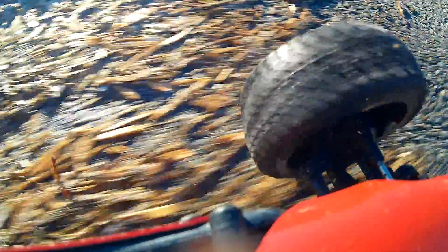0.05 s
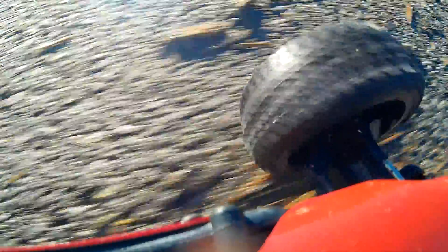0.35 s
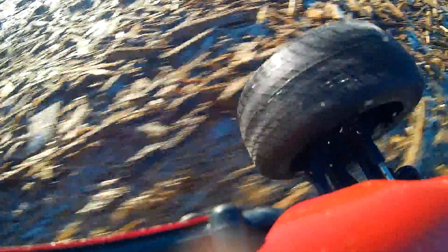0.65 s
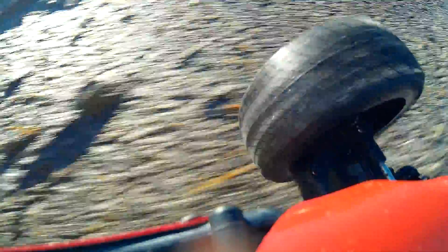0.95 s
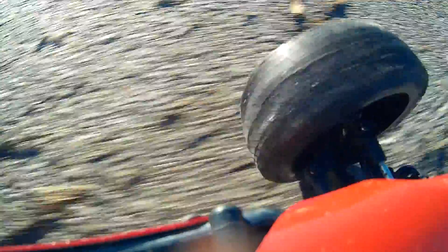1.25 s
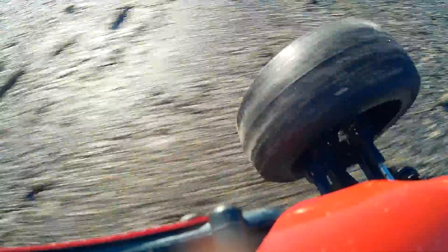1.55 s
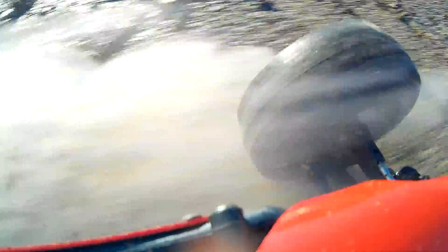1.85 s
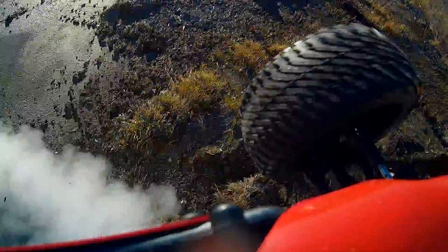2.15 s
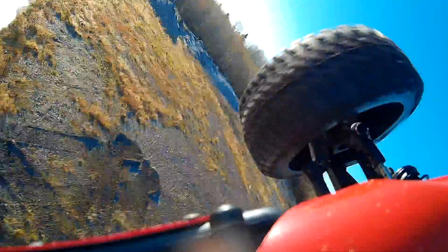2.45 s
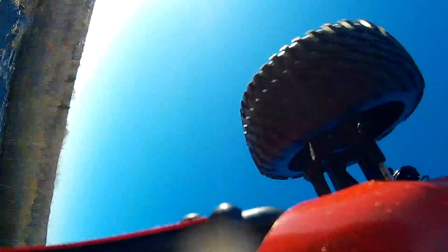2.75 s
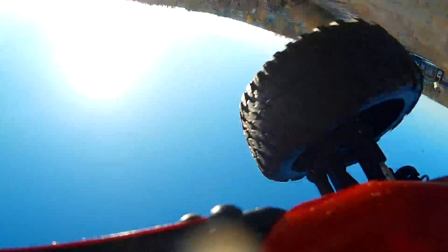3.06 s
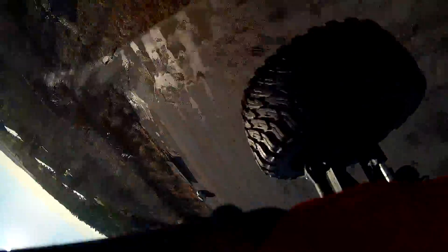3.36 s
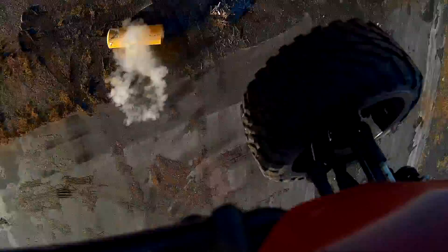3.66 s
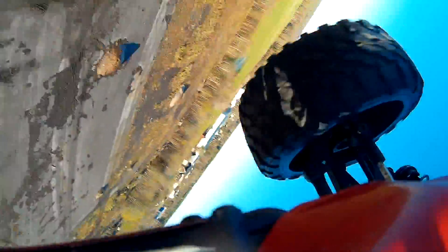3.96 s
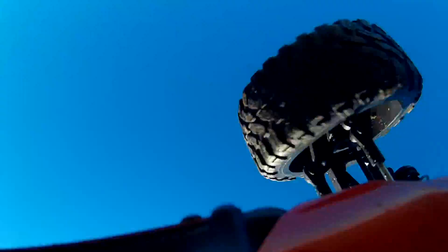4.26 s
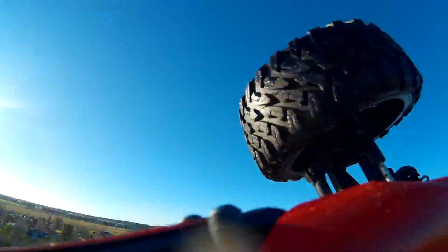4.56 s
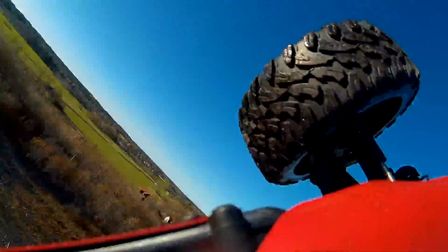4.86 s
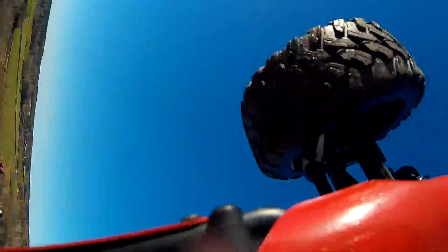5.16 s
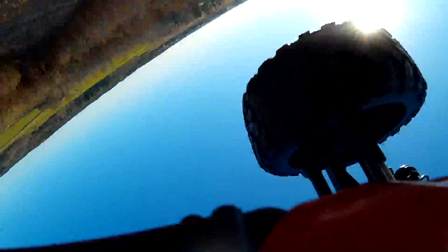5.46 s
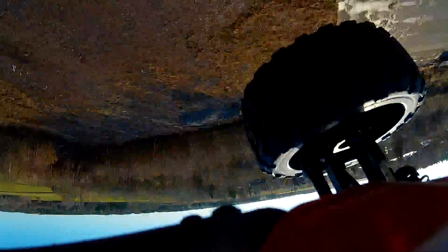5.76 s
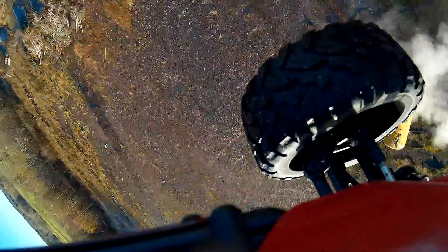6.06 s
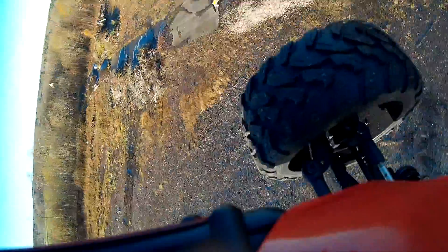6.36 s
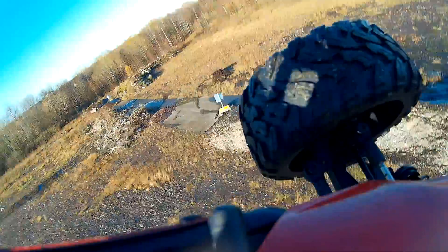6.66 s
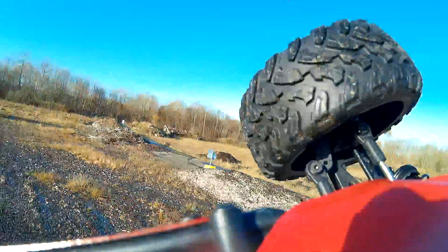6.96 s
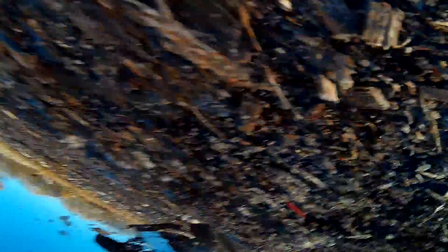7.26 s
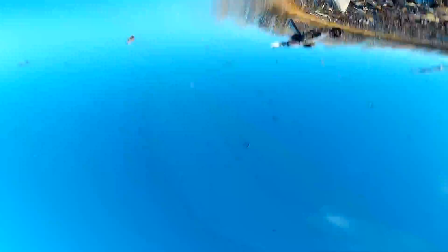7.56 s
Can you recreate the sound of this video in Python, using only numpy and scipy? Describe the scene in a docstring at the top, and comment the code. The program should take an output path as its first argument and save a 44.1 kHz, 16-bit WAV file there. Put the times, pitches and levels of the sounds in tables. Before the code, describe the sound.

A small electric model car is heard outdoors from a microphone on its body. At first its gears whine, rising and dipping, while the tyres drum on rough asphalt. A rocket motor sputters at about 1.4 and 1.6 seconds, then lights at 1.8 with a loud, bright hiss and a falling whoosh as the tyre noise stops. A distorted blast of air hits near 2.6 seconds and the hiss cuts off. In gusting wind, the free wheels blip at 3 seconds, spin up to a steady high hum from about 3.7, and wind down between 5.1 and 5.5. Air then whistles thinly, and heavy buffeting overloads the microphone just after 6 seconds. A short rising rev comes near 6.7. At 7.1 the car crashes with sharp cracks and thumps. Wood chips patter, and more clattering plastic knocks follow around 7.55 and 7.75 seconds.

```python
"""Gears whine and tyres drum on rough asphalt, heard from a microphone on a small electric model car.
A rocket motor sputters, lights and throws the car into the air. It tumbles through the wind, wheels
spinning up and braking, then crashes and cartwheels over wood chips. Each blow cracks, rings the
plastic shell and thumps the suspension. Rushing air and blows overload the microphone."""
import sys
import numpy as np
from scipy import signal
from scipy.fft import rfft, irfft
from scipy.io import wavfile
from scipy.ndimage import uniform_filter1d

SR = 44100
rng = np.random.default_rng(int(sys.argv[2]) if len(sys.argv) > 2 else 0)


def int16_out(signal):
    """Quantize to a 16-bit WAV file."""
    q = np.round(np.clip(np.atleast_2d(signal).T, -1, 1) * 32767)
    wavfile.write(sys.argv[1], SR, q.astype(np.int16))


N = 343980

# Levels are relative. Falls are per 20 dB; a negative fall cuts off at once.
TEETH = 39
TAKEOFF_S, TAKEOFF_FADE_S = 1.8, 0.1
GRIP_S, SPIN_UP_POWER = 0.042, 1.25
STRAIN_FULL_HZ_PER_S, STRAIN_WHINE_DB, STRAIN_OVERTONES_DB = 5830, 6.5, 2.5
GEARBOX_HZ, GEARBOX_WIDTH_HZ, GEARBOX_DB = 855, 65, 10
CRAWL_HZ, CRAWL_POWER, DULL_POWER, DULL_HZ = 960, 0.93, 1.76, 2040  # slow teeth: softer, duller
# skipping wheels race, then grip: t/s at the slowest, mesh before/Hz, mesh after/Hz
TYRE_GRIPS = [(0.036, 1298, 965), (0.156, 1260, 926), (.375, 1197, 995), (.51, 1417, 987),
              (.775, 1550, 1050), (.95, 1460, 1057), (1.125, 1422, 1093), (1.274, 1342, 1160),
              (1.39, 1370, 1200), (1.669, 1323, 1210), (1.78, 1340, 1255)]
# mesh rate in flight (blip, top speed, brake): t/s, f/Hz
FLIGHT_MESH = [(2.99, 943), (3.13, 1223), (3.391, 1151), (3.68, 1673), (3.82, 1730), (4.9, 1750),
               (5.07, 1716), (5.2, 1482), (5.3, 1213), (5.41, 766), (5.5, 150)]
# mesh rate of the last rev: t/s, f/Hz
LANDING_MESH = [(6.68, 180), (6.73, 505), (6.885, 802), (6.93, 1012), (6.98, 1400), (7.029, 1410),
                (7.16, 1273)]
# throttle: start/s, rise/s, hold/s, fall/s, rattle/dB, whine/dB
THROTTLE_BURSTS = [(-.1, .05, 1.37, -4.8, -28.5, -28), (1.099, 0.41, .3, 0.2, -27.5, -22.5),
                   (2.728, 0.074, .78, .2, -31.5, -47), (2.888, 0.19, 0.15, 0.8, -24, -33.5),
                   (3.232, 0.49, 1.76, 0.14, -24, -35.5), (6.639, 0.089, 0.375, 0.1, -23.5, -32.5)]
# mesh overtones: multiple, ground level/dB, air level/dB, roughness
MESH_OVERTONES = [(2, -18, -24, .6), (3, -23, -18, .6), (4, -22, -28, .8), (5, -15, -18, .7)]
# top-speed hum against mesh rate: f/Hz, level/dB
HUM_BY_MESH = [(1300, -39), (1550, -16.5), (1690, -6.5), (1750, -2)]
# hum lines: multiple of wheel rate, level/dB
HUM_LINES = [(2, -48.5), (7, -68), (8, -48.5), (9, -52), (11, -49.5), (18, -40), (19, -62), (30, -40),
             (38, -46), (40, -27), (41, -41), (42, -66), (45, -32), (75, -41), (82, -46), (84, -33)]
# broad chassis response: f/Hz, level/dB
CHASSIS_SLOPE = [(60, -16), (220, -51), (500, -4.5), (800, -2), (1300, 7.5), (2400, 0), (4500, 1),
                 (7800, -2.5), (9800, 7), (11000, 2), (12300, 9), (13800, -1)]
# chassis resonances: f/Hz, width/Hz, level/dB
CHASSIS_MODES = [(864, 173, 7.1), (1976, 153, 8.4), (2870, 550, 3.8), (3690, 370, 5.7), (5160, 160, 6.8),
                 (7020, 610, 3.9), (8620, 210, 5.1)]

# two sputters, burn, last gas: start/s, rise/s, hold/s, fall/s, level/dB
ROCKET_BURNS = [(1.402, 0.013, 0.0069, .08, -12), (1.63, .085, 0.011, -0.08, -10),
                (1.782, 0.066, 0.68, 0.265, -8), (2.55, 0.059, 0.11, -3.5, -19)]
# jet hiss: f/Hz, level/dB
JET_SPECTRUM = [(200, -4.5), (500, -3), (1000, -4.5), (1500, -1), (3000, -1), (6000, -1.5), (8000, 0.5),
                (9500, 4), (11500, 4), (13000, 3), (14000, -1), (14600, -12.5)]
# take-off whoosh: t/s, level/dB, f/Hz
JET_WHOOSH = [(1.95, -39, 7000), (2.0, -12, 4580), (2.025, -13, 1940), (2.06, -10, 1040), (2.11, -10, 684),
              (2.15, -23, 480)]

# flow past the car: t/s, level/dB
AIRFLOW_LEVEL = [(0, -29), (1.6, -28), (1.95, -40), (2.4, -23.5), (2.85, -9.5), (3.0, -26.5), (3.55, -30),
                 (3.75, -38), (4.3, -37), (4.45, -51), (4.76, -52), (5.12, -29), (5.85, -35), (6.15, -11),
                 (7.14, -26), (7.25, -35.5), (7.47, -42.5), (7.8, -31)]
# swells of rushing noise from jet wash, wind gusts and a scrape in the crash:
# start/s, rise/s, hold/s, fall/s, level/dB, brightness/Hz
RUSH_SWELLS = [(1.96, .13, .08, .25, -13.5, 1250), (2.22, .11, .35, .04, -11, 800),
               (2.535, .07, .032, .013, 10, 900), (2.695, .02, .014, .012, 3, 280),
               (2.765, .04, .085, .06, -10.5, 95), (3.265, .035, .25, .12, -16, 205),
               (3.73, .09, .04, .24, -22.5, 400), (4.06, .04, .02, .12, -28, 140),
               (5.03, .2, .15, .1, -28, 330), (5.4, .04, .03, .06, -22, 330), (5.45, .2, .35, .1, -25, 720),
               (5.99, .04, .05, .1, -12, 300), (6.05, .09, .075, .025, 0, 105),
               (6.255, .03, .19, .03, -3, 180), (6.5, .03, .19, .08, -26, 270),
               (6.73, .11, .28, .08, -22.5, 520), (7.32, .035, .005, .05, -29, 200)]
# air singing over edges: t/s, level/dB, f/Hz
EDGE_TONE = [(5.42, -26.5, 2035), (5.5, -27.5, 1980), (5.6, -34, 2420), (5.68, -23.5, 3020),
             (5.78, -24, 2560), (5.88, -24.5, 2160), (6.01, -23, 1900), (6.1, -38, 1790)]
# turbulence feeding the edge tone: f/Hz, level/dB
EDGE_SPECTRUM = [(200, 7.5), (2000, 0), (4000, -6), (7000, -23), (14000, -3)]
# thin hiss of the descent: t/s, level/dB
HISS_LEVEL = [(5.6, -48), (5.8, -34), (6.02, -28), (6.07, -31.5)]
# same hiss: f/Hz, level/dB
HISS_SPECTRUM = [(1500, -1), (4200, 2), (7000, -8), (13000, -12)]
# single eddies on the microphone: t/s, level/dB, half-width/s
EDDY_SLAPS = [(5.439, -16, 0.0066), (5.484, -17.5, 0.0027), (6.149, -3.5, 0.0075), (6.167, -4, 0.0036),
              (6.19, 0.5, 0.0019), (6.28, -5, 0.0011), (6.322, -8, 0.0072), (6.357, -8, 0.0084),
              (6.507, -10.5, 0.00087), (6.538, -23.5, 0.0066), (6.678, -18.5, 0.0017), (6.708, -32, 0.0054)]
# eddy slap: f/Hz, level/dB
SLAP_SPECTRUM = [(30, -12), (90, 7), (300, -1.5), (900, -9.5), (2000, -12), (5000, -24.5), (14000, -43)]
# buffeting: f/Hz, level/dB
BUFFET_SPECTRUM = [(12, -1), (30, -12.5), (60, -5.5), (110, -13), (300, -44), (2000, -91)]

# impacts: t/s, crack/dB, crack decay/s, shell ring/dB, thump/dB
CRASH_BLOWS = [(7.13, 5, 0.0068, -20, -24), (7.134, 5, 0.0034, -17.5, -7), (7.141, 1, 0.0025, 2, -4),
               (7.158, 3.5, 0.0031, -3, 4.5), (7.163, 8, 0.0018, -19, -21), (7.174, -12, 0.003, -19, -29),
               (7.186, -34, 0.0067, -34, -34), (7.2198, -22, 0.0022, -25, -36),
               (7.2534, -19, 0.00053, -42, -42), (7.312, -18.5, 0.0014, -40, -41),
               (7.3348, -32, 0.0015, -22, -24), (7.411, -38, 0.0059, -30, -50),
               (7.461, -30.5, 0.0049, -35, -46), (7.512, -39, 0.0024, -38, -44), (7.55, -6, 0.0034, 6, -33),
               (7.5629, 8, 0.0009, -7, -2), (7.5675, 6.5, 0.0014, -18, -31), (7.572, -10, 0.0022, -2, -21),
               (7.585, -20, 0.0048, -11, -10), (7.5941, 1, 0.00093, -4, -31),
               (7.621, -19, 0.00089, -22, -49), (7.665, -35, 0.013, -44, -40),
               (7.6725, -30, 0.001, -15, -31), (7.6945, -41, .003, -22, -29),
               (7.7165, -35, 0.0035, -24, -27), (7.7464, 0.5, 0.0012, -8, -22),
               (7.752, -27, 0.0043, -33, -31), (7.7571, -14, 0.0023, -25, -21),
               (7.7624, 4, 0.0043, -23, -24), (7.771, -26, .004, -22, -26), (7.777, -5, 0.0042, -4, -4),
               (7.795, -46, 0.0036, -22, -31)]
# plastic shell: f/Hz, level/dB, t60/s
SHELL_MODES = [(1930, -24, 0.035), (3000, -10.5, 0.023), (4130, -6.5, 0.032), (4360, -6.5, 0.014),
               (4630, -4.5, 0.012), (5100, -22, .012), (9700, -32, .008)]
# loose wood chips: t/s, level/dB
CHIP_LEVEL = [(7.17, -37), (7.25, -48), (7.42, -51), (7.52, -58), (7.65, -53), (7.7, -47.5), (7.8, -65)]
# cracks and chips: f/Hz, level/dB
CRACK_SPECTRUM = [(100, 7), (700, 2), (1300, -0.5), (1900, 7), (2600, -3.5), (4300, -1.5), (6000, -3),
                  (10000, -1), (14000, -7)]

# asphalt bumps: t/s, level/dB, half-width/s
ROAD_BUMPS = [(.02, -31, 0.081), (.445, -22, 0.015), (1.39, -29, 0.018), (1.666, -22, 0.0077)]
# tyres on grit: f/Hz, level/dB
TYRE_SPECTRUM = [(25, -8), (70, 1), (200, 3), (400, 1.5), (700, -4), (1500, -9.5), (2500, -14),
                 (4000, -17.5), (7000, -26.5), (14000, -28)]


def drive(waver=0.0043, jitter=0.0074, throb_db=0.34, rattle_db=4.0, overtones_db=1.5, soften_db=-8):
    """Gear teeth whine and rattle; the wheel runs out of true, so both swell once a turn."""
    mesh_hz, on_ground = mesh_rate(), ground_contact()
    pace = np.minimum(mesh_hz / CRAWL_HZ, 1)
    force, whine_gain = throttle() * pace ** CRAWL_POWER
    # teeth press harder while the free wheels speed up or brake
    strain = (1 - on_ground) * np.minimum(np.abs(np.gradient(mesh_hz)) * SR / STRAIN_FULL_HZ_PER_S, 1)
    speed_spread = jitter * (on_ground + 0.064) + waver * strain
    mesh_rad = 2 * np.pi * np.cumsum(mesh_hz * (1 + speed_spread * drift(60.6))) / SR
    wheel_rad = mesh_rad / TEETH
    throb = from_db(throb_db * (np.sin(wheel_rad) + 2.3 * drift(270)))
    knocking = throb * (1 + 0.18 * np.cos(mesh_rad))
    rattle = from_db(rattle_db) * knocking * noise(chassis_db(bins_hz()))
    dull = signal.sosfiltfilt(signal.butter(2, DULL_HZ, fs=SR, output="sos"), rattle)
    rattle = dull + pace ** DULL_POWER * (rattle - dull)
    tone = whine_gain * from_db(STRAIN_WHINE_DB * strain) * whine(mesh_hz, mesh_rad, on_ground)
    hum_gain = from_db(db_at(HUM_BY_MESH, mesh_hz))
    hum = hum_gain * top_speed_hum(wheel_rad)
    bite = from_db(overtones_db + STRAIN_OVERTONES_DB * strain + soften_db * hum_gain)
    upper = pace ** 2 * bite * overtones(mesh_hz, mesh_rad, on_ground)
    return tone + hum + force * (rattle + upper)


def whine(mesh_hz, mesh_rad, on_ground, wobble=0.15, rough_air=0.4, rough_ground=0.34, skip_db=2.1):
    """Tooth-rate tone, shaken by gear play; flares through the gearbox resonance."""
    rough = rough_air + (rough_ground - rough_air) * on_ground
    uneven_teeth = 1 + wobble * np.cos(mesh_rad / TEETH)
    tone = uneven_teeth * (1 + rough * drift(69)) * np.cos(mesh_rad + rough * drift(115))
    # the motor pulls hardest where gripping tyres slow it
    pull_db = np.clip(-19 * np.log2(mesh_hz / 1200), -7, 6)
    load = from_db(on_ground * (pull_db + skip_db * drift(26)))
    flare_db = GEARBOX_DB / (1 + ((mesh_hz - GEARBOX_HZ) / GEARBOX_WIDTH_HZ) ** 2)
    return load * from_db(chassis_db(mesh_hz) + flare_db) * tone


def top_speed_hum(wheel_rad, waver_rad=0.073, unbalance_rad=0.0089, octave_db=-25.5):
    """Free wheels and gears hum at multiples of the wheel rate and an octave above the mesh."""
    angle_rad = wheel_rad + unbalance_rad * np.sin(wheel_rad)
    lines = sum(from_db(db) * np.cos(order * angle_rad + rng.uniform(0, 2 * np.pi) + waver_rad * drift(14))
                for order, db in HUM_LINES)
    octave = from_db(octave_db) * np.cos(2 * TEETH * angle_rad)
    return np.sqrt(2) * (lines + octave)


def overtones(mesh_hz, mesh_rad, on_ground, extra_resonance=1.07):
    """Rough mesh harmonics flare as they cross chassis resonances."""
    out, grid_hz = 0, np.geomspace(200, 12000, num=1000)
    response_db = chassis_db(grid_hz) + extra_resonance * resonances_db(grid_hz)
    for order, ground_db, air_db, rough in MESH_OVERTONES:
        tone = (1 + rough * drift(140)) * np.cos(order * mesh_rad + rough * drift(140))
        source_db = air_db + (ground_db - air_db) * on_ground
        out = out + from_db(source_db + np.interp(order * mesh_hz, grid_hz, response_db)) * tone
    return out


def mesh_rate(inertia_s=0.012):
    """Teeth per second: a sawtooth of skips and grips, then free spin; inertia rounds the corners."""
    points, share = [], np.linspace(0, 1, num=6)
    last_s, last_hz = -GRIP_S, TYRE_GRIPS[0][1]
    for s, before_hz, after_hz in TYRE_GRIPS:
        skip_s = last_s + share * (s - GRIP_S - last_s)
        skip_hz = last_hz + share ** SPIN_UP_POWER * (before_hz - last_hz)
        points += zip(skip_s, skip_hz)
        last_s, last_hz = s, after_hz
    points += [(last_s, last_hz), (TAKEOFF_S + TAKEOFF_FADE_S, last_hz), *FLIGHT_MESH, *LANDING_MESH]
    return uniform_filter1d(in_time(points)[0], round(inertia_s * SR))


def throttle():
    """Rattle and whine gains; the strongest burst sets each."""
    bursts = [from_db([[rattle_db], [whine_db]]) * swell(*shape)
              for *shape, rattle_db, whine_db in THROTTLE_BURSTS]
    return np.max(bursts, axis=0)


def ground_contact():
    """1 on the ground, 0 in the air."""
    return np.clip(1 - (np.arange(N) / SR - TAKEOFF_S) / TAKEOFF_FADE_S, 0, 1)


def chassis_db(hz):
    """Response of the chassis, which carries the drive's sound."""
    return db_at(CHASSIS_SLOPE, hz) + resonances_db(hz)


def resonances_db(hz):
    """Bell-shaped lift of the chassis modes."""
    return sum(db * np.exp(-np.minimum(((hz - mode_hz) / width_hz) ** 2, 20))
               for mode_hz, width_hz, db in CHASSIS_MODES)


def rocket(flutter_db=1.8, whoosh_damping=0.21):
    """Bright, fluttering gas jet; its whoosh falls in pitch at take-off."""
    thrust = np.max([from_db(db) * swell(*shape) for *shape, db in ROCKET_BURNS], axis=0)
    hiss = thrust * from_db(flutter_db * drift(116)) * coloured(JET_SPECTRUM)
    whoosh = swept_lowpass(rng.standard_normal(N), in_time(JET_WHOOSH)[1], whoosh_damping)
    return hiss + level(JET_WHOOSH) * whoosh


def wind(lump_db=1.5, eddies_db=-34, low_cut_hz=45, buffet_db=-1, surge_db=2.0):
    """Swelling rush; eddies slap and buffet the microphone; air sings over edges, with thin hiss."""
    strength, brightness_hz = rush_envelope()
    rush = swept_lowpass(rng.standard_normal(N), 0.5 * brightness_hz, damping=2.68)
    rush = signal.sosfilt(signal.butter(2, low_cut_hz, "high", fs=SR, output="sos"), rush)
    fine_eddies = from_db(eddies_db) * coloured([(300, -28), (1800, -19), (4000, 3), (14000, -19)])
    rush = strength * from_db(lump_db * drift(45)) * (rush + fine_eddies)
    edge = edge_tone()
    hiss = level(HISS_LEVEL) * coloured(HISS_SPECTRUM)
    slaps = puffs(EDDY_SLAPS) * coloured(SLAP_SPECTRUM)
    surge = from_db(buffet_db + surge_db * drift(7.3))
    buffet = surge * level(AIRFLOW_LEVEL) * coloured(BUFFET_SPECTRUM)
    return rush + edge + hiss + slaps + buffet


def edge_tone(gain_db=-3, wander=0.054, damping=0.2):
    """Turbulence over the edges feeds a wandering resonance."""
    edge_hz = in_time(EDGE_TONE)[1] * (1 + wander * drift(20))
    return from_db(gain_db) * level(EDGE_TONE) * swept_lowpass(coloured(EDGE_SPECTRUM), edge_hz, damping)


def rush_envelope(steady_db=-5.5, steady_hz=150):
    """Gain and brightness/Hz of the rush: swells add to the steady flow, weighted by power."""
    powers = [(from_db(steady_db) * level(AIRFLOW_LEVEL)) ** 2]
    powers += [(from_db(db) * swell(*shape)) ** 2 for *shape, db, _ in RUSH_SWELLS]
    colours_hz = [steady_hz] + [hz for *_, hz in RUSH_SWELLS]
    total = sum(powers) + 1e-18
    brightness_hz = sum(power * hz for power, hz in zip(powers, colours_hz)) / total
    return np.sqrt(total), np.maximum(brightness_hz, 20)


def crash(scatter_db=5.5, detune=0.039, sway_db=-14):
    """Each blow cracks, rings the shell and thumps the suspension; loose chips patter between."""
    t = np.arange(N) / SR
    cracks, shell, kicks = np.zeros((3, N))
    mode_hz, mode_db, t60_s = np.transpose(SHELL_MODES)[:, :, None]
    for s, crack_db, decay_s, ring_db, thump_db in CRASH_BLOWS:
        i = min(round(s * SR), N - 1)
        age_s = t[:min(N - i, SR // 10)]
        cracks[i:i + len(age_s)] += from_db(crack_db) * np.exp(-age_s / decay_s)
        # each blow lands on another spot, so the shell's colour varies
        strength, shift = rng.standard_normal((2, len(SHELL_MODES), 1))
        envelopes = from_db(mode_db + scatter_db * strength - 60 * age_s / t60_s)
        modes = envelopes * np.sin(2 * np.pi * mode_hz * (1 + detune * shift) * age_s)
        shell[i:i + len(age_s)] += from_db(ring_db) * modes.sum(axis=0)
        kicks[i] = from_db(thump_db)
    chips = level(CHIP_LEVEL) * from_db(8.2 * drift(140))
    crunch = (cracks + chips) * coloured(CRACK_SPECTRUM)
    thump = ring(kicks, hz=70, t60_s=0.055)
    sway = from_db(sway_db) * ring(kicks, hz=30, t60_s=0.23)
    return crunch + shell + thump + sway


def tyres(rolling_db=-23.5, rise_db_per_s=5, uneven_db=1.76, gain_db=1.0):
    """Tread drums unevenly on grit, louder as the car gathers speed."""
    rolling = ground_contact() ** 2 * from_db(rolling_db + rise_db_per_s * np.arange(N) / SR)
    grit = from_db(gain_db + uneven_db * drift(80)) * coloured(TYRE_SPECTRUM)
    return (rolling + puffs(ROAD_BUMPS)) * grit


def microphone_hiss(level_db=-54):
    """Faint steady noise floor."""
    return from_db(level_db) * coloured([(100, 10), (2000, -11), (14000, 4)])


def from_db(db):
    """Decibels to gain."""
    return 10 ** (np.asarray(db) / 20)


def unit_rms(x):
    """Scale to rms 1."""
    return x / np.sqrt(np.mean(x ** 2) + 1e-20)


def in_time(rows):
    """Columns after t/s, interpolated to every sample."""
    s, *columns = np.transpose(rows)
    return [np.interp(np.arange(N) / SR, s, column) for column in columns]


def level(rows, fade_s=0.038):
    """Gain from rows of t/s, level/dB; fades beyond the ends."""
    t = np.arange(N) / SR
    outside_s = np.maximum(rows[0][0] - t, t - rows[-1][0])
    return from_db(in_time(rows)[0]) * np.clip(1 - outside_s / fade_s, 0, 1)


def swell(start_s, rise_s, hold_s, fall_s):
    """Smooth attack, hold, then 20 dB lost per fall time."""
    age_s = np.arange(N) / SR - start_s
    attack = np.sin(np.pi / 2 * np.clip(age_s / max(rise_s, 1e-3), 0, 1)) ** 2
    return attack * 10 ** -np.clip((age_s - rise_s - hold_s) / max(fall_s, 1e-3), 0, 8)


def puffs(rows):
    """Bell-shaped gains from rows of t/s, level/dB, half-width/s."""
    t = np.arange(N) / SR
    return sum(from_db(db) * np.exp(-np.minimum(((t - s) / width_s) ** 2, 50)) for s, db, width_s in rows)


def db_at(points, hz):
    """Read rows of f/Hz, level/dB on a log-frequency axis."""
    points_hz, db = np.transpose(points)
    return np.interp(np.log(hz + 1), np.log(points_hz), db)


def bins_hz():
    """Frequencies of a full-length spectrum."""
    return np.arange(N // 2 + 1) * SR / N


def noise(db):
    """Noise shaped by a level per bin; rms 1."""
    return unit_rms(irfft(rfft(rng.standard_normal(N)) * from_db(db), N))


def coloured(points):
    """Noise shaped by rows of f/Hz, level/dB; rms 1."""
    return noise(db_at(points, bins_hz()))


def drift(corner_hz):
    """Slow random wander; rms 1."""
    size = N // 20
    rolloff = 1 + (bins_hz()[:size // 2 + 1] / corner_hz) ** 2
    slow = irfft(rfft(rng.standard_normal(size)) / rolloff, size)
    return np.interp(np.arange(N) / 20, np.arange(size), unit_rms(slow))


def swept_lowpass(x, hz, damping, block=128):
    """Two moving poles; keeps the power of white noise."""
    out, state = np.zeros(N), np.zeros(2)
    for i in range(0, N, block):
        w = 2 * np.pi * hz[i] / SR
        r = np.exp(-w * damping)
        a1, a2 = -2 * r * np.cos(w), r * r
        gain = np.sqrt((1 - a2) * ((1 + a2) ** 2 - a1 ** 2) / (1 + a2))
        out[i:i + block], state = signal.lfilter([gain], [1, a1, a2], x[i:i + block], zi=state)
    return out


def ring(clicks, hz, t60_s):
    """A unit click starts a decaying unit sine."""
    r, w = from_db(-60 / (t60_s * SR)), 2 * np.pi * hz / SR
    return signal.lfilter([0, np.sin(w)], [1, -2 * r * np.cos(w), r * r], clicks + 1e-18)


def scene():
    """All sources at one microphone, same on both channels."""
    floor = microphone_hiss()
    return np.tile(drive() + tyres() + rocket() + wind() + crash() + floor, (2, 1))


def record(dry):
    """The microphone clips hard; treble is then cut."""
    ceiling, stopband_hz = 0.5, 15150
    clipped = np.clip(dry, -ceiling, ceiling)
    return signal.sosfiltfilt(signal.cheby2(10, 35, stopband_hz, fs=SR, output="sos"), clipped)


dry = scene()
out = record(dry)
int16_out(out)
```